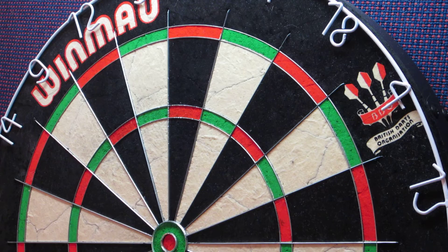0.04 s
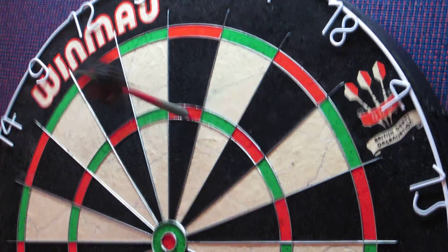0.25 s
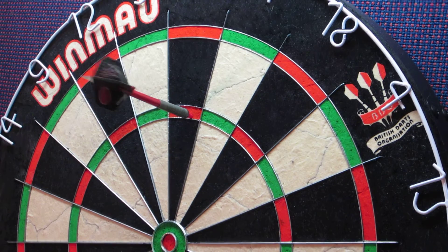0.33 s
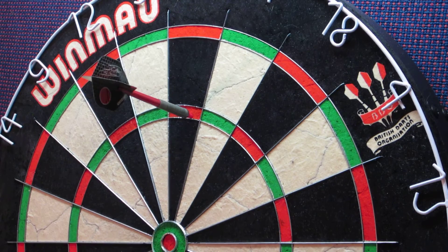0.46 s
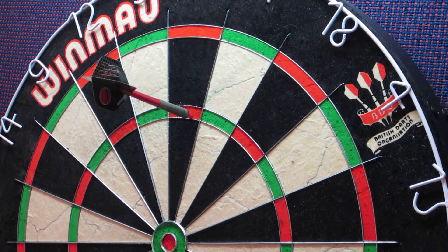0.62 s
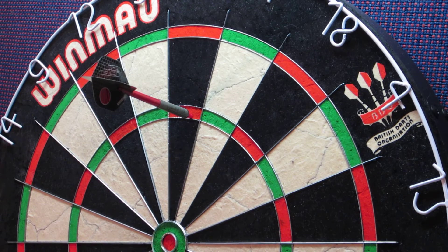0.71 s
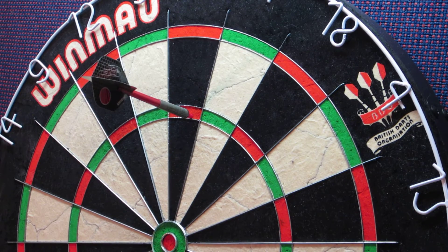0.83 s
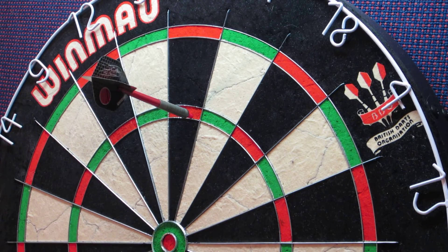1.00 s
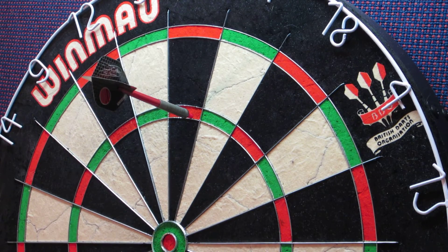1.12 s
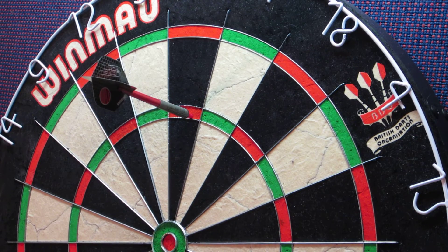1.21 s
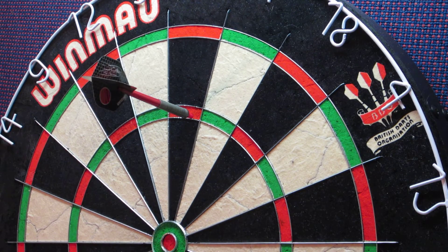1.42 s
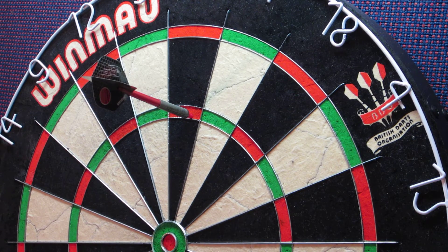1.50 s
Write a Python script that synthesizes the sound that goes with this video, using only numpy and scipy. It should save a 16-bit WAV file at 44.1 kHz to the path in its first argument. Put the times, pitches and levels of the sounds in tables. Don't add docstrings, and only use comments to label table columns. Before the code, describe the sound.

A dart thuds into a fibre dartboard with a sharp tick, in a small quiet humming room

```python
import sys
import numpy as np
from scipy import signal
from scipy.fft import rfft, irfft, next_fast_len
from scipy.io import wavfile
from scipy.ndimage import map_coordinates

SR = 44100
rng = np.random.default_rng(int(sys.argv[2]) if len(sys.argv) > 2 else 0)


def int16_out(signal):
    q = np.round(np.clip(np.atleast_2d(signal).T, -1, 1) * 32767)
    wavfile.write(sys.argv[1], SR, q.astype(np.int16))


def volts_from_db(level):
    exponent = np.asarray(level, float) / 20
    return 10 ** exponent


N = 68355
LEFT_RIGHT = np.array([[1], [-1]])

# (time [s], level [dB])
BLOWS = [
    (.2314, -31),
    (.233, -38.5),
    (.2346, -32),
    (.2361, -14),
    (.2371, -15.5),
    (.2381, -8.5),
]


def unit(x):
    return x / np.sqrt(np.mean(x ** 2) + 1e-20)


def along(points, hz):
    f, value = np.transpose(points)
    return np.interp(np.log(hz + 1), np.log(f + 1), value)


def filtered(x, response):
    m = next_fast_len(N + SR // 2)
    spectrum = rfft(x, m) * response(np.fft.rfftfreq(m, 1 / SR))
    return irfft(spectrum, m)[..., :N]


def peak(f, hz, width_hz):
    return 1j * f * width_hz / (hz * hz - f * f + 1j * f * width_hz)


def delays(rows):
    return lambda f: sum(volts_from_db(db) * np.exp(-2j * np.pi * f * s) for s, db in rows)


def pair(response):
    # (frequency [Hz], likeness [-1 to 1])
    likeness = [(60, 0.59), (180, 0.44), (550, 0.13), (1650, -0.0089), (4970, -0.26), (15000, 0.37)]

    def middle_and_side(hz):
        turn = np.arccos(np.clip(along(likeness, hz), -1, 1)) / 2
        return response(hz) * [np.cos(turn), np.sin(turn)]

    mid, side = filtered(rng.standard_normal((2, N)), middle_and_side)
    return unit(np.array([mid + side, mid - side]))


def ringing(modes, rise_s, wander):
    t = np.arange(N) / SR
    total = 0
    for hz, db, t60 in modes:
        drift = map_coordinates(rng.standard_normal(100), [t * 40])
        phase = 2 * np.pi * hz * t + wander * np.minimum(t / 0.03, 1) * drift
        total = total + volts_from_db(db - 60 * t / t60) * np.sin(phase)
    return (1 - np.exp(-t / rise_s)) * total


def earlier_knock():
    level_db, t60_s, centre_hz, width_hz = -42, 0.24, 556, 610
    fade = volts_from_db(level_db - 60 * np.arange(N) / SR / t60_s)
    return fade * pair(lambda f: peak(f, centre_hz, width_hz) ** 2)


def hum():
    # (frequency [Hz], level [dB per Hz])
    rumble = [(8.8, -30), (15, -28.5), (59, -0.5), (96, -9), (136, -1.5), (173, -13), (204, -3), (264, -17),
              (320, -6), (420, -81), (700, -120)]
    moving_air = [(150, -57), (250, -7), (329, -11), (366, -4), (673, -9), (735, -9.5), (818, -14),
                  (851, -10.5), (2600, -22.5), (3380, -36), (5720, -120)]
    hiss = [(1500, -61), (2500, -19.5), (3250, -9), (5700, -10.5), (9670, -20.5), (12000, -39.5),
            (14000, -25), (15800, -30)]
    # (frequency [Hz], width [Hz], level [dB])
    fan_tones = [(57.8, 18, -77), (128.4, 6, -64), (214.8, 17, -60), (691, 3.1, -64.5), (813, 3.9, -64)]
    # (frequency [Hz], left minus right [dB])
    lean = [(60, -3.0), (240, 0), (950, 0.0), (3770, 0.5), (15000, 0.5)]

    def layer(rows, db):
        closed = [(rows[0][0] * 0.9, -120)] + list(rows) + [(rows[-1][0] * 1.1, -120)]
        return volts_from_db(db) * pair(lambda f: volts_from_db(along(closed, f)))

    sway = map_coordinates(rng.standard_normal(16), [np.arange(N) * 6 / SR])
    out = layer(rumble, -49.5) + volts_from_db(0.23 * sway) * layer(moving_air, -52) + layer(hiss, -68.5)
    for hz, width_hz, db in fan_tones:
        out = out + volts_from_db(db) * pair(lambda f: peak(f, hz, width_hz) ** 2)
    hiss_top_hz = 15800
    return filtered(out, lambda f: volts_from_db(along(lean, f) / 2 * LEFT_RIGHT) * (f < hiss_top_hz))


def tip():
    # (frequency [Hz], width [Hz], level [dB])
    point_modes = [(3420, 370, -5), (5050, 480, 1.5), (9500, 2200, -13), (14900, 3700, -15.5)]
    touch_s, slide_s = 0.2311, 0.004
    tick_db, tick_t60_s = -12, 0.0046
    crunch_db, crunch_t60_s, snap_db = -23, 0.0038, -13

    t = np.arange(N) / SR - touch_s
    mid, side = rng.standard_normal((2, N))
    grit = mid + 0.1 * side * LEFT_RIGHT
    tick = volts_from_db(tick_db - 60 * np.abs(t) / tick_t60_s)
    crunch = volts_from_db(crunch_db - 840 * np.abs(t) - 60 * np.maximum(t - slide_s, 0) / crunch_t60_s)
    snap = volts_from_db(snap_db) * (np.arange(N) == round(touch_s * SR))
    drive = (t >= 0) * grit * (tick + crunch) + snap

    def steel(f):
        total = sum((-1) ** k * volts_from_db(db) * peak(f, hz, width_hz)
                    for k, (hz, width_hz, db) in enumerate(point_modes))
        return total * (1 - peak(f, 12100, 3500))

    return filtered(drive, steel)


def board(modes, rise_s, wander):
    soft_hz, radiate_hz = 4170, 270

    def blows_to_air(f):
        bass_loss = (1j * f / (radiate_hz + 1j * f)) ** 3
        return delays(BLOWS)(f) * bass_loss / (1 + 1j * f / soft_hz) ** 4

    return -filtered(ringing(modes, rise_s, wander), blows_to_air)


def backing():
    # (frequency [Hz], level [dB], time to fade by 60 dB [s])
    mount_modes = [(113, -12, 0.085), (253, -21, 0.089)]
    wall_modes = [(91, -20.5, 0.3), (228.4, -16, 0.46)]
    low = ringing(mount_modes, 0.002, 0) + ringing(wall_modes, 0.021, 0)
    mount_hz = 72
    return filtered(low, lambda f: delays(BLOWS)(f) * (1j * f / (mount_hz + 1j * f)) ** 2)


def wall_echoes(face):
    # (delay [s], level [dB])
    echoes = [(.0116, -17), (.0242, -17), (.0272, -23), (.046, -26)]
    return filtered(face, delays(echoes))


def room(x):
    # (frequency [Hz], time to fade by 60 dB [s])
    fading = [(100, 0.52), (500, 0.21), (2000, 0.22), (5000, .18), (12000, 0.094)]
    hz, t, z = signal.stft(rng.standard_normal((2, SR // 2)), SR, nperseg=256)
    fade = volts_from_db(-60 * t / along(fading, hz)[:, None])
    mid, side = signal.istft(z * fade, SR, nperseg=256)[1]
    turn = np.arccos(0.73) / 2
    tail = np.cos(turn) * mid + np.sin(turn) * side * LEFT_RIGHT
    tail = tail / np.linalg.norm(tail[0])
    late = np.pad(x, (150, 0))[None]
    return signal.fftconvolve(late, tail, axes=1)[:, :N]


def rustles():
    puff_s = [.42, .496, .53, .595, .595, 1.092, 1.06, 1.15, 1.08]
    # (level [dB], length [s], centre [Hz], width [Hz])
    puffs = [
        (-63, 0.012, 5600, 5500),
        (-52, 0.0097, 3430, 3900),
        (-59.5, 0.081, 2200, 5400),
        (-51, 0.057, 1560, 1000),
        (-65, 0.033, 5700, 5800),
        (-63, .012, 5600, 6000),
        (-67.5, 0.051, 5000, 5000),
        (-67.5, 0.11, 710, 110),
        (-59, 0.12, 2060, 1300),
    ]
    t = np.arange(N) / SR
    out = 0
    for s, (db, length_s, hz, width_hz) in zip(puff_s, puffs):
        shape = np.exp(-np.abs(t - s) / length_s * np.where(t < s, 3.5, 1))
        out = out + volts_from_db(db) * shape * pair(lambda f: peak(f, hz, width_hz) ** 4)
    return out


def scene():
    # (frequency [Hz], level [dB], time to fade by 60 dB [s])
    face_modes = [(487, 3, 0.021), (590, -8.5, 0.027), (733, 3.5, 0.047), (800, -12, .03),
                  (996, -2.5, 0.044), (1073, -3, 0.018), (1197, -10.5, 0.034), (1383, -6.5, .04),
                  (1586, -6.5, 0.033), (1736, -16.5, 0.088), (1900, -46, 0.032), (2310, -20, 0.058)]
    body_modes = [(423, -7.5, 0.21), (685, -12.5, 0.33), (710, -12.5, 0.32), (966.7, -23.5, 0.06),
                  (968, -20, 0.22), (1318, -11, 0.15), (1719, -14, 0.21), (1910, -23.5, 0.096)]
    face = board(face_modes, 0.0001, 0)
    body = board(body_modes, 0.005, 0.96)
    point = tip()

    near = (face + body) * volts_from_db([[-0.5], [0.6]]) + point * volts_from_db(6.5 / 2 * LEFT_RIGHT)
    face_to_room = filtered(face, lambda f: 1 - 0.68 * peak(f, 1020, 340))
    tails = volts_from_db(-7) * room(face_to_room) + volts_from_db(-11.5) * room(point.mean(axis=0))
    thump = backing() * volts_from_db([[-1], [1.1]])
    background = earlier_knock() + hum() + rustles()
    return near + wall_echoes(face) + tails + thump + background


def top_cut(x):
    return signal.sosfilt(signal.butter(12, 16830, fs=SR, output="sos"), x)


def record(dry):
    top_hz = 16100
    mix = filtered(dry, lambda f: 1 / (1 + (f / top_hz) ** 60))
    return top_cut(mix)


dry = scene()
out = record(dry)
int16_out(out)
```